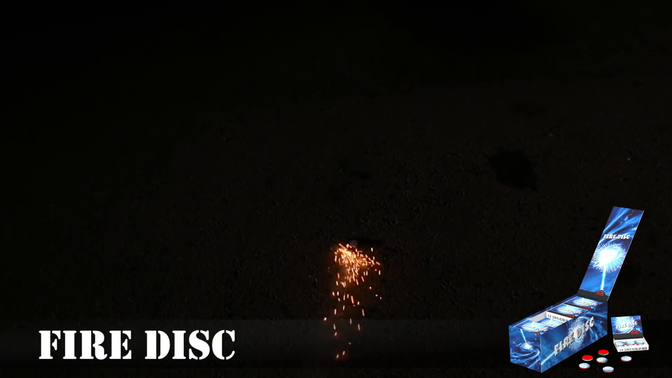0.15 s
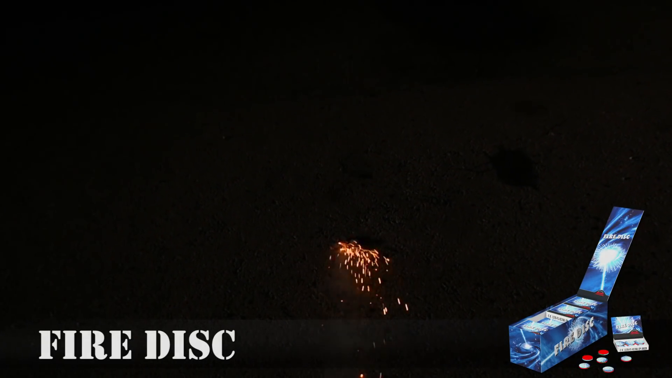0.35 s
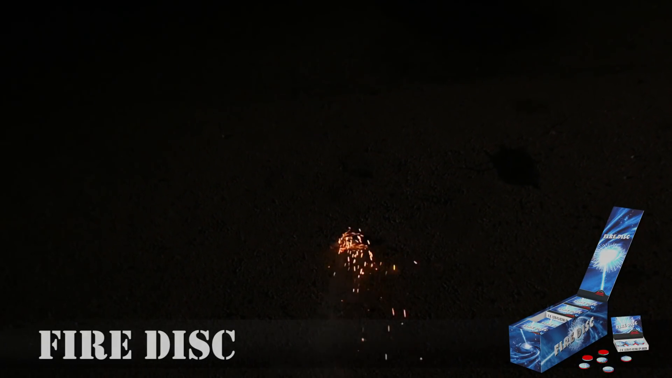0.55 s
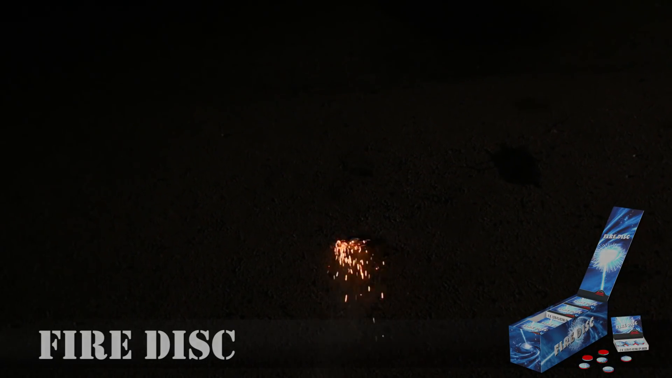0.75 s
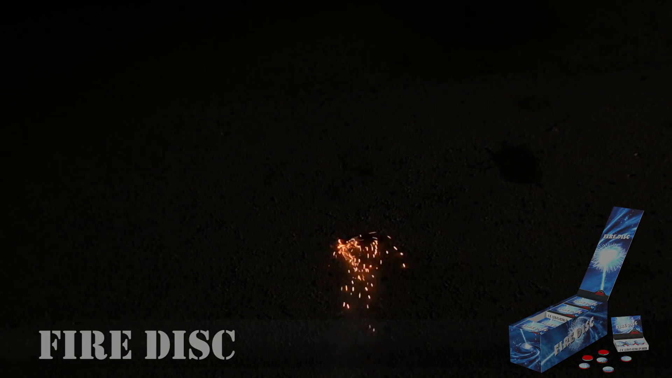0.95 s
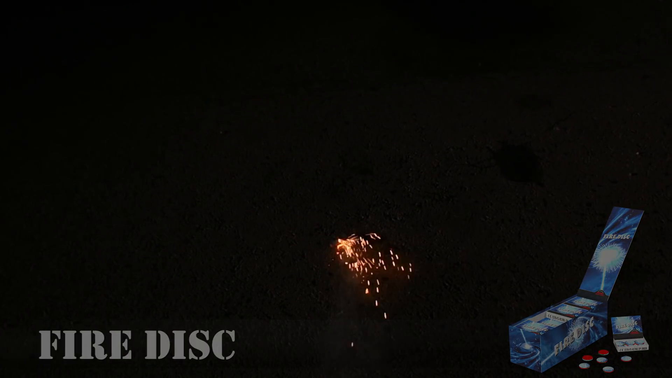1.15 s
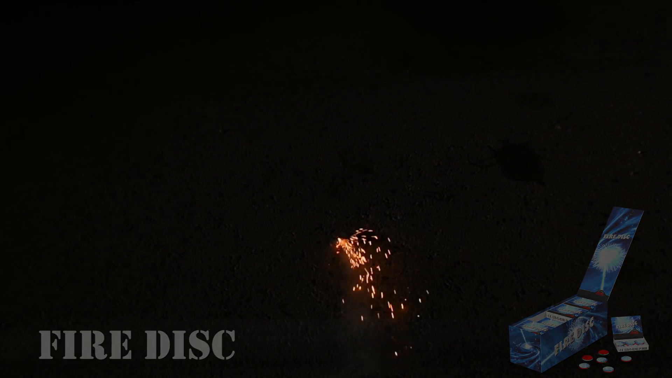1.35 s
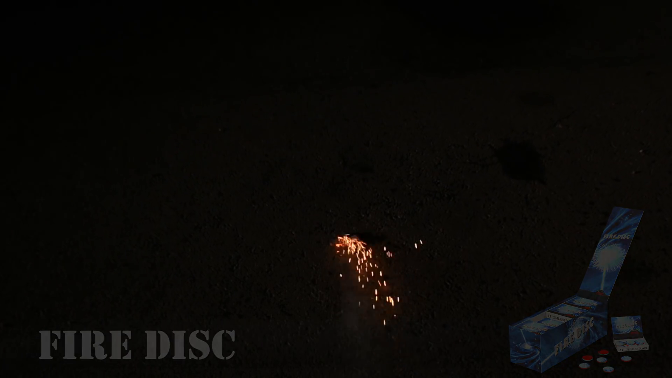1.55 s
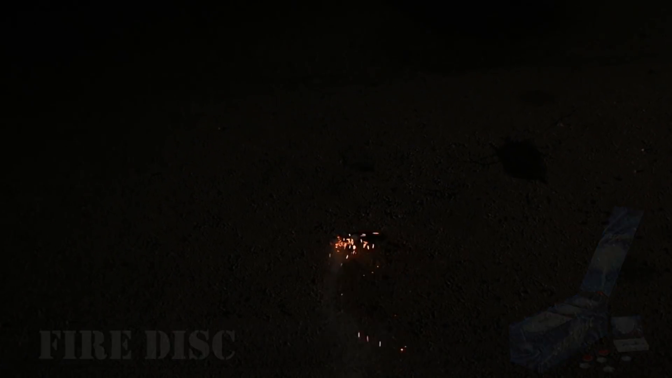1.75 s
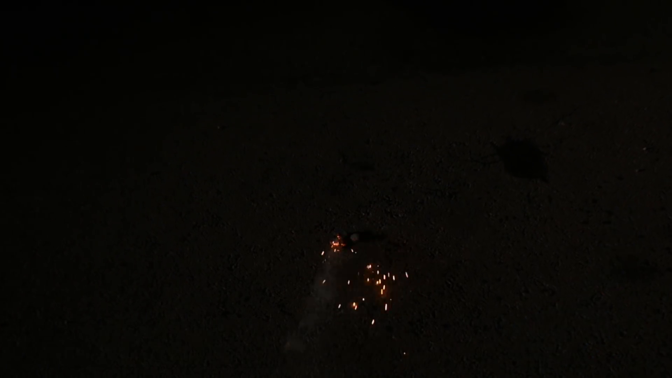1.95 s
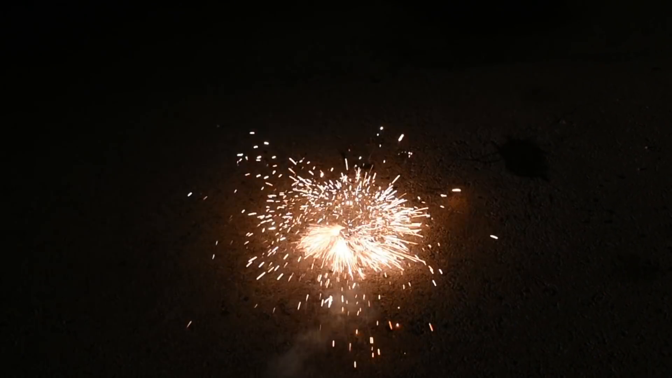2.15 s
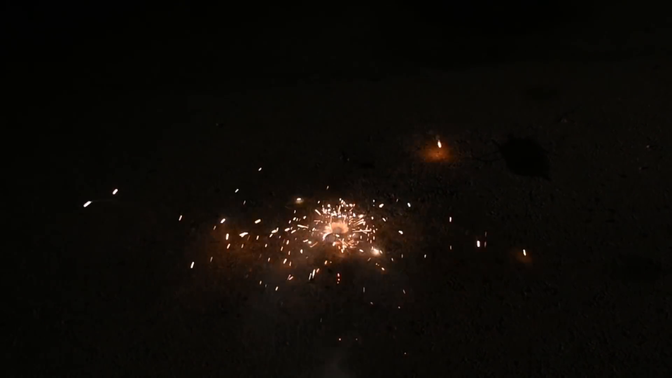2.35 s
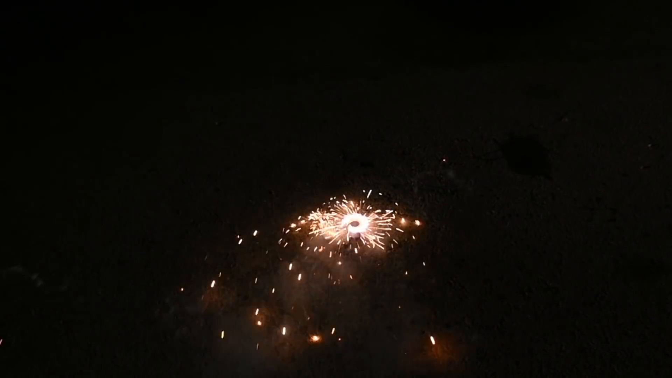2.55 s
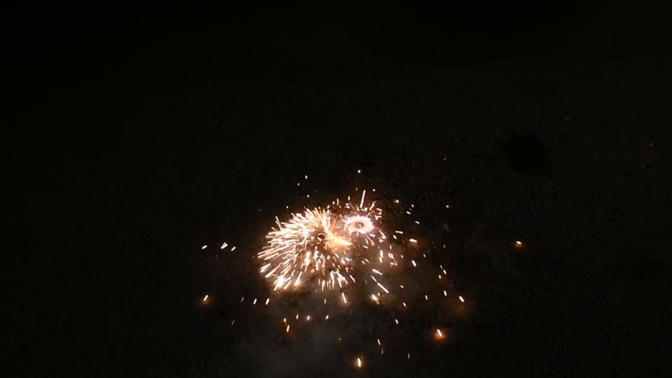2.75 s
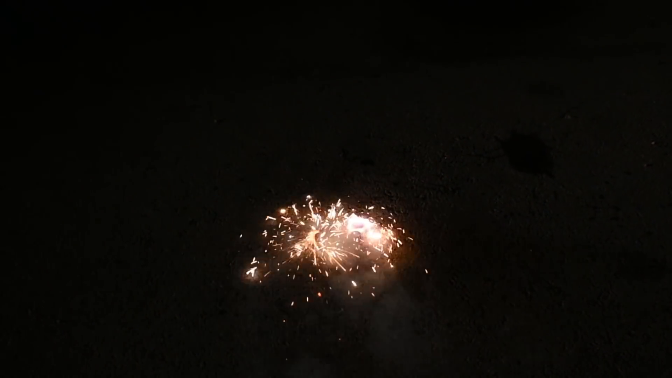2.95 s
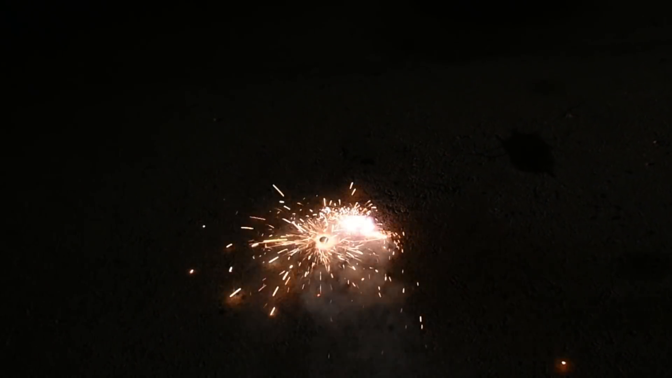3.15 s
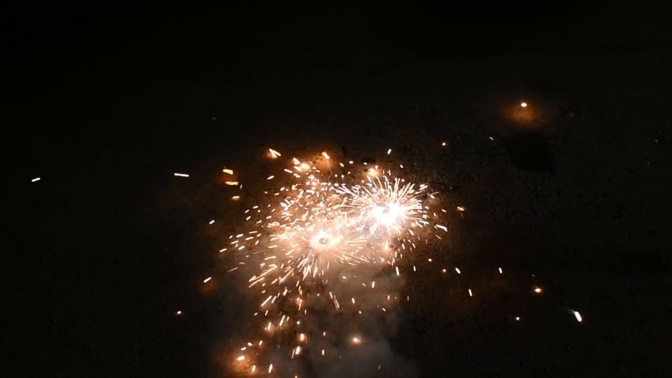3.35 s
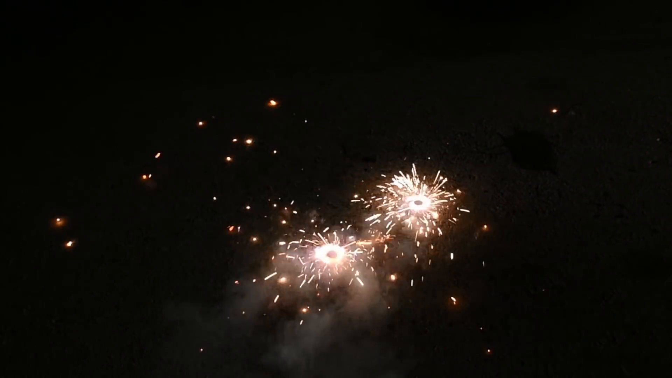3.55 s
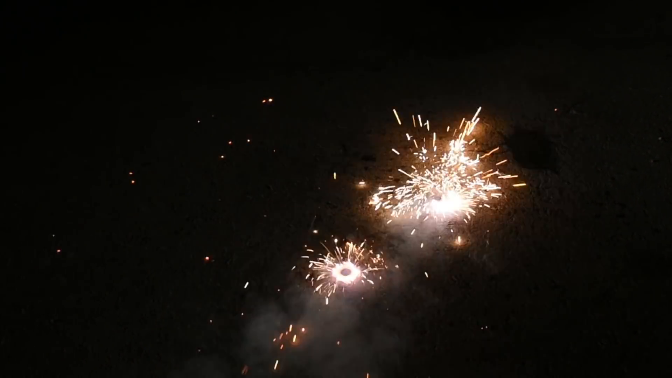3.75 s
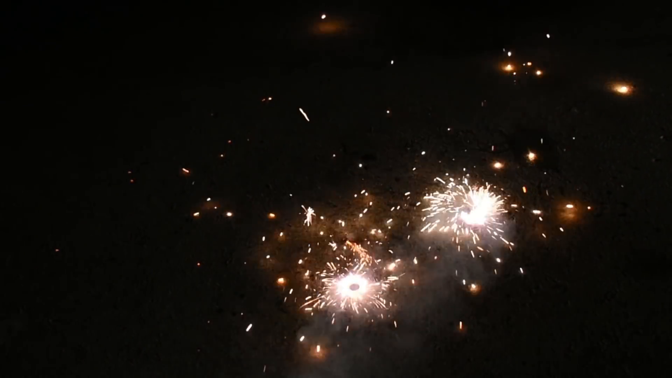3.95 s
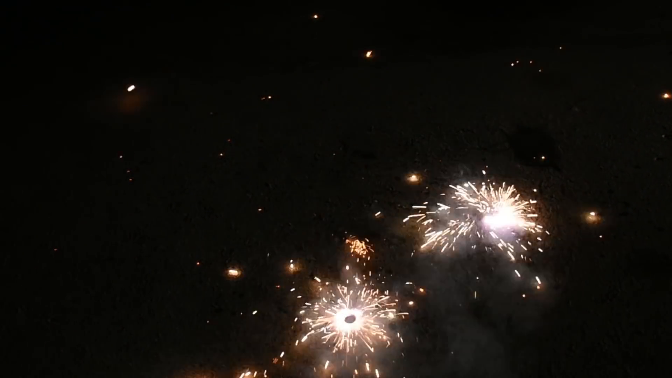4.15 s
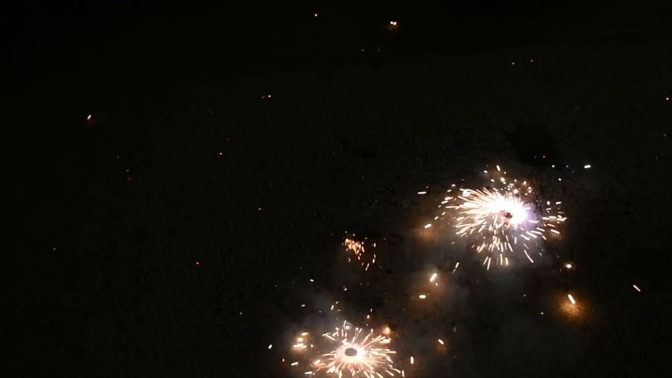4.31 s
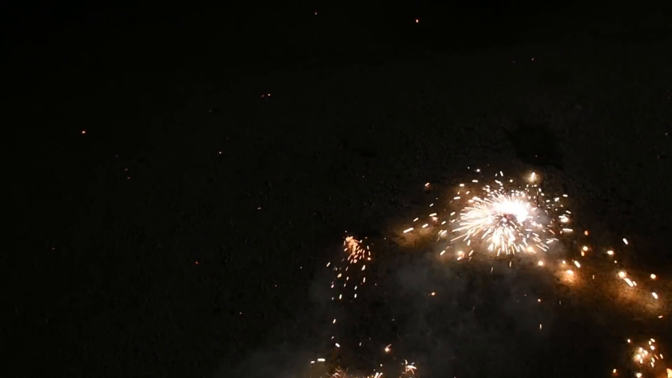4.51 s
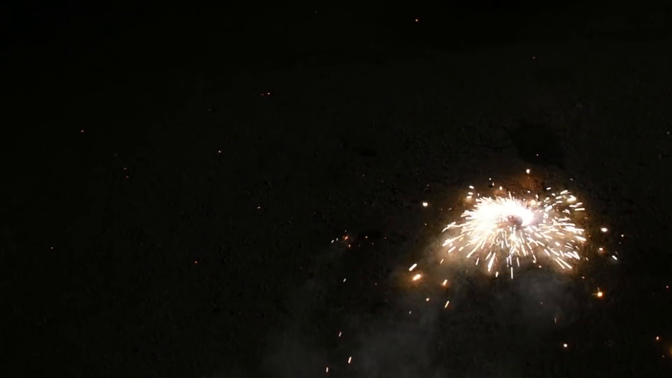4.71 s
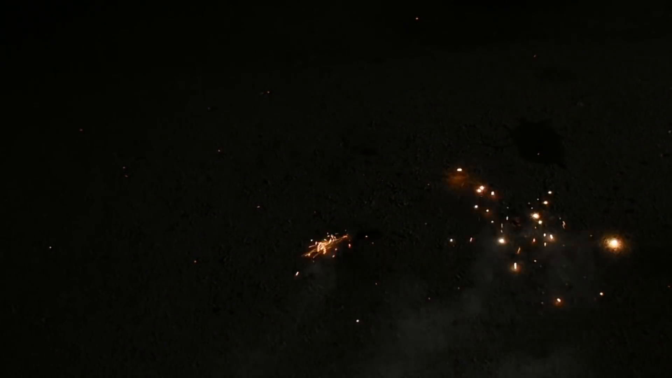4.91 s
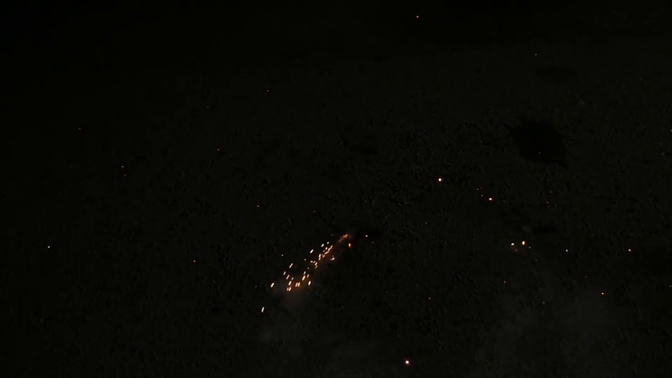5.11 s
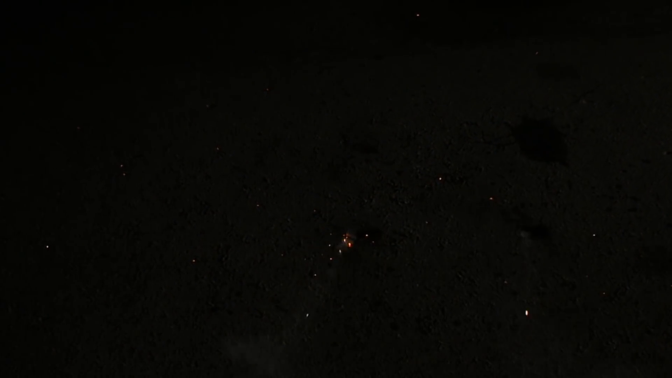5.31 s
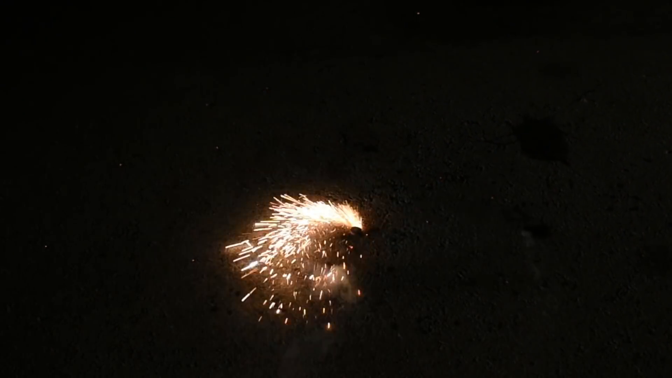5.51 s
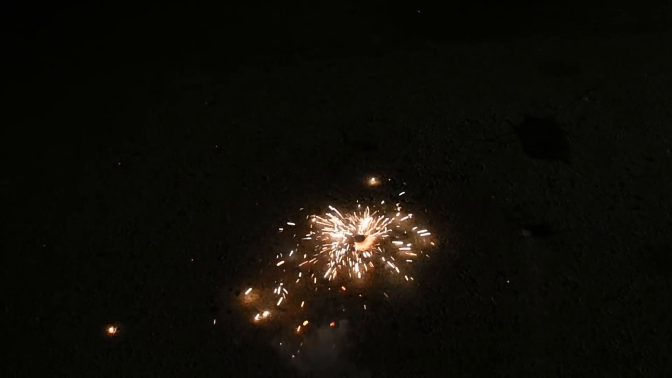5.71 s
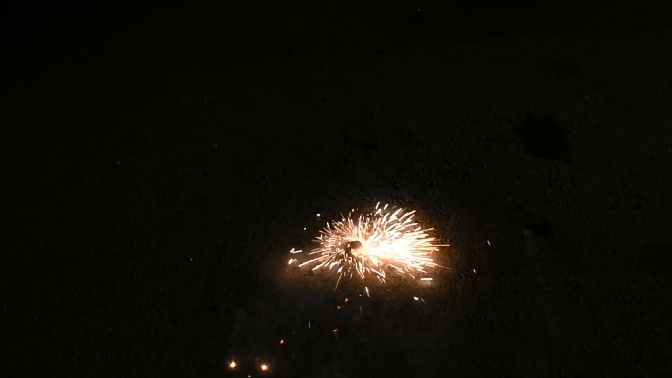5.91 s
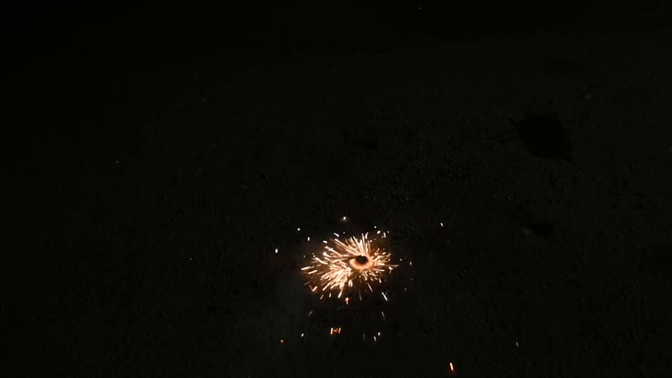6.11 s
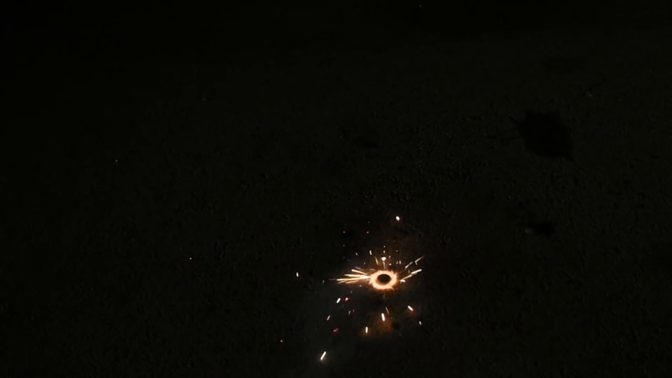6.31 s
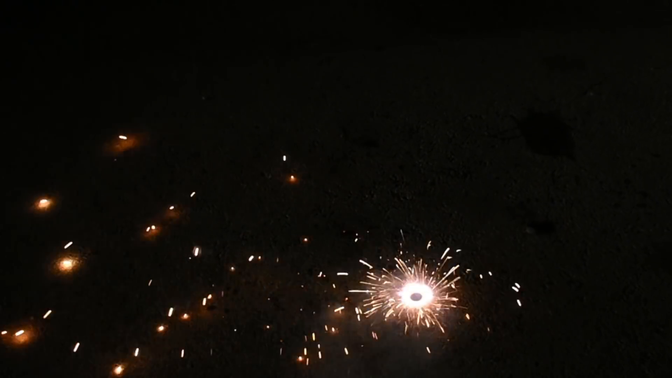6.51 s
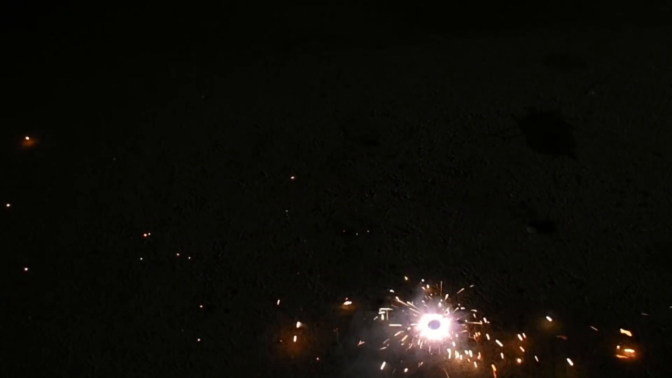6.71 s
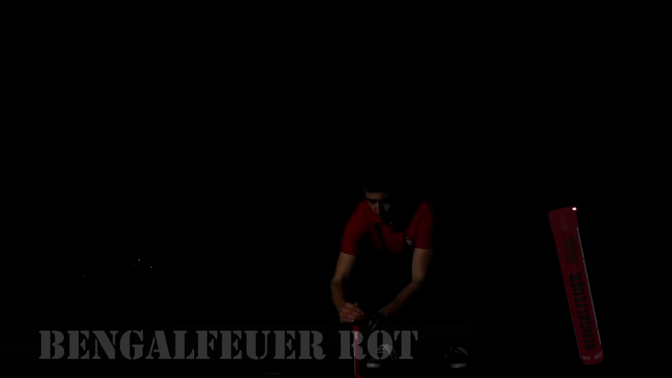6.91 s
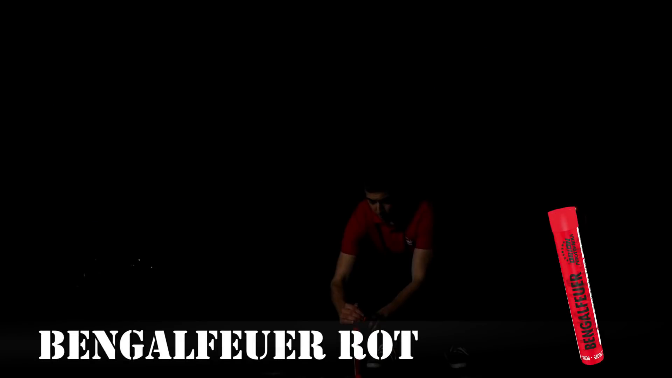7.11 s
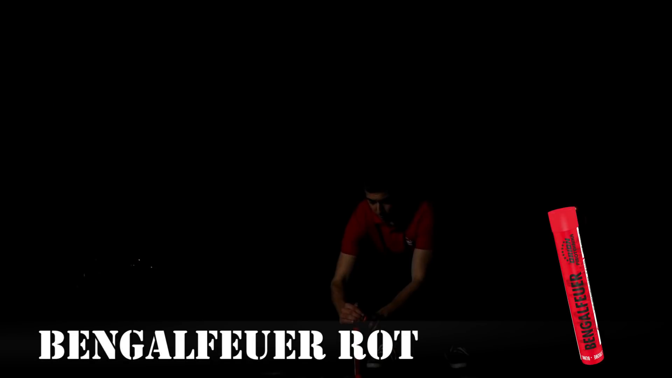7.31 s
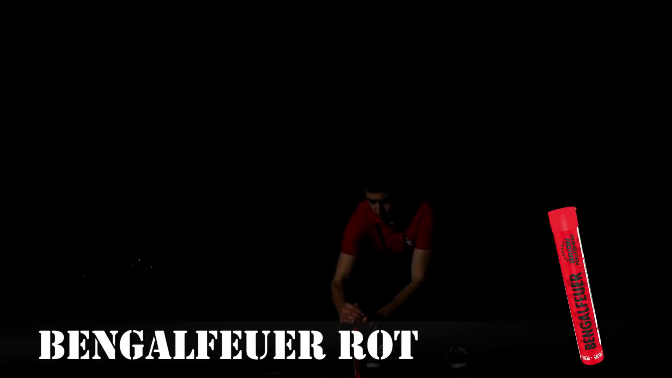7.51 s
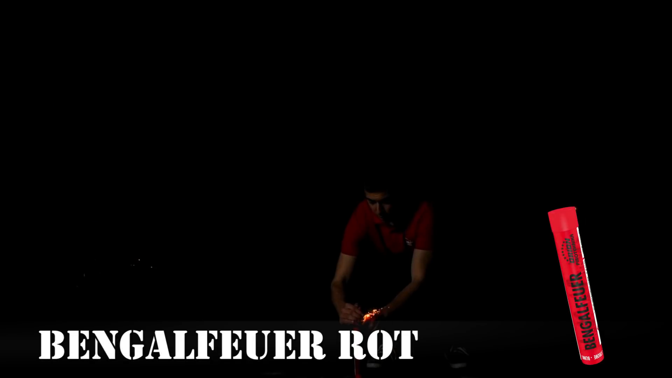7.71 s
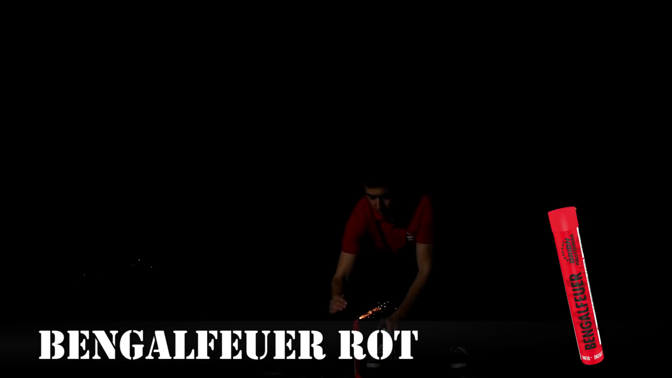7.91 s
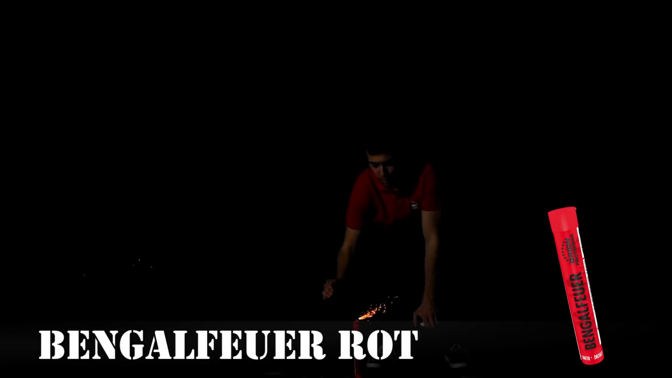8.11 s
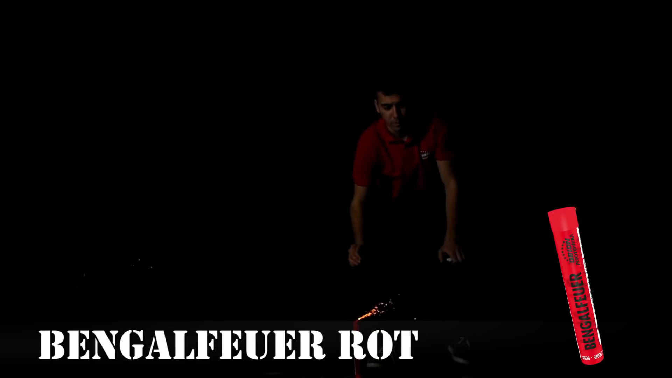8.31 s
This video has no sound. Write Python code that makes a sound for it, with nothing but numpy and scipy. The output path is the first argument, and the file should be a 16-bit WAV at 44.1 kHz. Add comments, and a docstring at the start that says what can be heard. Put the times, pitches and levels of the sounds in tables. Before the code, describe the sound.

Quiet fizz and wind bumps give way to loud whirring jets of sparks, a sharp metallic snap, sudden quiet, and a fresh faint fizz.

```python
"""A fuse fizzes and spits at night on pavement; from 2.1 s small firework discs spin, a few metres away. Jets
roar and hiss as gas noise and sparks, the treble sweeping once a turn; rims knock the ground as pulses. Dull
pulses pop and thud. At 6.9 s the scene changes: a lighter's resonant snap sounds as the jets end and the wind
drops. In the quiet another fuse catches at 7.75 s. Night noise and wind on the microphone ports run throughout."""
import sys
import numpy as np
from scipy import signal
from scipy.fft import rfft, irfft, next_fast_len
from scipy.io import wavfile
from scipy.ndimage import uniform_filter1d

SR = 44100
rng = np.random.default_rng(int(sys.argv[2]) if len(sys.argv) > 2 else 0)


def amplitude_ratio(level_db):
    """Convert a level in decibels to the matching linear amplitude (field) ratio."""
    exponent = np.asarray(level_db, float) / 20
    return 10 ** exponent


def wav_out(sig):
    """Save sig, one row per channel (or a flat mono array), as 16-bit PCM at SR to the path in sys.argv[1]."""
    wavfile.write(sys.argv[1], SR, np.round(np.clip(np.atleast_2d(sig).T, -1, 1) * 32767).astype(np.int16))


N = 368543
T = np.arange(N) / SR
HZ = np.fft.rfftfreq(next_fast_len(N), 1 / SR)


def shape(x, gain):
    """Filter by a gain for each frequency of HZ."""
    size = next_fast_len(N)
    return irfft(rfft(x, size) * gain, size)[..., :N]


def colour(table):
    """Gain of a (Hz, dB) table, interpolated over log frequency."""
    hz, db = np.transpose(table)
    return amplitude_ratio(np.interp(np.log(HZ + 1), np.log(hz), db))


def band(lo_hz, hi_hz):
    """Gain of a soft band; bands that share an edge add up to full power."""
    return np.sqrt(1 / (1 + (HZ / hi_hz) ** 10) - 1 / (1 + (HZ / lo_hz) ** 10))


def mode(hz, width_hz):
    """Causal resonance, gain 1 at its centre."""
    return 1j * HZ * width_hz / (hz ** 2 - HZ ** 2 + 1j * HZ * width_hz)


def unit(x, gain=0.9971):
    """Scale x so that its part within gain has rms 1."""
    return x / np.std(shape(x, gain))


def read(table):
    """Columns of a curve at every sample, and a gate that is open while it lasts."""
    s, *columns = np.transpose(table)
    gate = uniform_filter1d(1. * ((T >= s[0]) & (T <= s[-1])), size=200)
    return [np.interp(T, s, c) for c in columns] + [gate]


def walk(rate_hz):
    """Random levels held 1 / rate_hz seconds and slewed twice; spread near 1."""
    hold = int(SR / rate_hz)
    levels = rng.standard_normal(N // 50)[np.arange(N) // hold]
    return 1.19 * uniform_filter1d(uniform_filter1d(levels, hold), hold)


def swells(table):
    """Bell-shaped gains in dB from (s, dB, length s) rows."""
    return sum(db * np.exp(-((T - s) / length_s) ** 2) for s, db, length_s in table)


def sparks(rate_hz, spread_db):
    """Random clicks of burning metal grains, a few louder than the rest."""
    size_db = spread_db * np.minimum(rng.exponential(size=N), 3)
    struck = rng.random(N) < rate_hz / SR
    return unit(struck * rng.uniform(-0.83, 1, N) * amplitude_ratio(size_db))


def night():
    """Distant traffic and the microphone's own hiss, as one coloured noise."""
    # Spectrum. Each row: frequency in Hz, relative density in dB per Hz.
    night_colour = [(59, -31.5), (100, -6.5), (135, 0), (150, -4.5), (335, -12), (1060, -12), (1760, -19.5),
                    (7940, -29), (14700, -36.5), (16000, -48)]
    level_db = -55
    mid, side = shape(rng.standard_normal((2, N)), colour(night_colour))
    gain = amplitude_ratio(level_db + 1.0 * walk(3.079)) / np.std(mid)
    return gain * (mid + amplitude_ratio(-11) * side * np.array([[1], [-1]]))


def wind():
    """Gusty low-frequency pressure on the ports, partly different left and right."""
    # Breeze level. Each row: time in seconds, level in dB.
    breeze = [(0, -47.5), (1.5, -46.5), (2.0, -49.5), (5.3, -50.5), (6.93, -44), (6.95, -61.5),
              (7.3, -60.5), (7.66, -49.5), (7.9, -58), (8.36, -60.5)]
    # Gusts. Each row: centre in seconds, gain in dB, length in seconds.
    gust_rows = [(.33, 3.5, 0.031), (.52, 6, .04), (.8, 5, 0.116), (1.28, 5, 0.034), (1.4, 7, 0.0215),
                 (2.32, 7.5, 0.062), (3.28, 4.5, 0.09), (4.58, 8, .04), (4.85, 4, 0.107),
                 (5.57, 10.5, 0.052), (5.75, 12, .03), (6.43, 14, 0.042), (7.64, 8, 0.048), (4.9, 8, .012)]
    mid, side = shape(rng.standard_normal((2, N)), band(24, 80))
    flutter = unit(amplitude_ratio(1.9 * walk(22)))
    flutter = flutter / np.sqrt(np.mean(flutter ** 2))
    level = amplitude_ratio(read(breeze)[0] + swells(gust_rows)) * flutter
    return level * (unit(mid) + amplitude_ratio(-12.5) * unit(side) * np.array([[1], [-1]]))


def snap():
    """A lighter's metal snap: a tick and scattered echoes from walls nearby, through metal resonances."""
    # Metal modes. Each row: centre in Hz, width in Hz before squaring, level in dB.
    snap_modes = [(6070, 1200, 0.5), (9300, 3500, -7), (15500, 3000, -11), (3440, 900, -11.5)]
    start_s, peak_db, echo_db, t60_s = 6.8838, -10, -32.5, .34
    t = T - start_s
    tick = 1. * (np.arange(N) == int(start_s * SR))
    decay = amplitude_ratio(-60 * np.clip(t, 0, None) / t60_s)
    echoes = amplitude_ratio(echo_db) * rng.standard_normal(N) * (t > .003) * decay
    ring = sum(amplitude_ratio(db) * mode(hz, width_hz) ** 2 for hz, width_hz, db in snap_modes)
    # the tick alone sets the peak
    return amplitude_ratio(peak_db) * shape(tick + echoes, ring) / np.abs(shape(tick, ring)).max()


def hits():
    """Pops, bumps and thuds: short dull pulses, a few cycles that die away."""
    # Each row: start in seconds, nominal peak in dB, pitch in Hz, decay in cycles.
    pulses = [(0.328, -22.5, 90, 0.68), (.368, -28.5, 1300, 0.9), (0.406, -27, 399, 1.11),
              (.409, -27, 700, 1.51), (.468, -29.5, 5500, 3.2), (.51, -33, 110, 0.87),
              (0.527, -29.5, 110, 0.73), (0.741, -29.5, 60, 0.84), (.787, -23.5, 119, 1.55),
              (1.269, -28, 70, 0.87), (1.487, -27.5, 59.7, 0.5), (3.307, -23, 94.4, 3.3),
              (5.452, -42.5, 180, 1.36), (6.015, -16.5, 350, 1.46), (6.421, -20.5, 65, 0.715),
              (6.449, -17, 200, 0.73)]
    out = np.zeros(N)
    for s, db, hz, cycles in pulses:
        t = np.clip(T - s, 0, None)
        out += amplitude_ratio(db) * 1.126 * np.sin(2 * np.pi * hz * t) * np.exp(-1.5 * t * hz / cycles)
    return out


def fuses():
    """Powder cord fizzes and spits, as noise and sparks; its brighter ranges come and go on their own."""
    # One table a fuse. Each row: time in seconds, level in dB, sizzle over level in dB, hiss over level in dB.
    fuse_levels = [
        [(0.0, -53.5, -1.5, -6), (0.5, -53.5, -1, -6.5), (1.4, -55, -1.5, -4), (2.08, -55.5, -7.5, -5)],
        [(7.752, -70.5, 3, -2.5), (7.758, -56.5, -3, -2.5), (7.878, -51, -4, -4), (7.936, -53.5, -5.5, -4.5),
         (8.008, -58, 5.5, 5), (8.164, -54.5, 8.5, 4), (8.357, -57, 2.5, 1.5)],
    ]
    # One spectrum a fuse. Each row: frequency in Hz, relative density in dB per Hz.
    fuse_colours = [
        [(76, -26.5), (130, 2), (253, -15.5), (285, -6.5), (651, -16), (1240, -12.5), (2720, -20), (5730, -31),
         (16000, -38)],
        [(120, -44), (200, -7.5), (387, -1), (683, -1.5), (735, 1), (1620, -3), (2170, -8), (4040, -8.5),
         (16000, -16)],
    ]
    # Spits. Each row: centre in seconds, treble gain in dB, length in seconds.
    spits = [(.214, 5.5, .002), (.369, 4.5, .002), (.46, 6.5, 0.014), (1.665, 6, .0015),
             (1.689, 8.5, .0015), (1.74, 7, .006), (1.747, 12, .0015), (1.858, 9, .0015)]
    out = 0
    for table, tint in zip(fuse_levels, fuse_colours):
        db, sizzle_db, hiss_db, gate = read(table)
        gate = np.maximum(gate, np.roll(gate, 600))  # smoulders on 14 ms; the first fuse meets the jet
        grains = 0.548 * sparks(900, 3.0) + 0.3 * sparks(45, 2.5)
        fizz = shape(rng.standard_normal(N) + grains, colour(tint))
        body = unit(shape(fizz, band(112, 2148)), band(1304, 2700)) * amplitude_ratio(0.75 * walk(15))
        sizzle = unit(shape(fizz, band(2633, 6250))) * amplitude_ratio(sizzle_db + swells(spits) + 1.7 * walk(30))
        hiss = unit(shape(fizz, band(7900, 20660))) * amplitude_ratio(hiss_db + swells(spits) + 1.1 * walk(30))
        out = out + gate * amplitude_ratio(db + 0.77 * walk(25)) * (body + sizzle + hiss)
    return out


def spins():
    """Each turn swings the jet towards the listener and knocks the rim on the ground."""
    # One table a spin. Each row: time in seconds, mean turns per second, rim knock level in dB.
    spin_curves = [
        [(2.12, 13.6, -60), (2.24, 27.4, -45), (2.31, 60, -43), (2.335, 76, -40), (2.365, 82, -26.5),
         (2.43, 83.5, -28.5), (2.47, 80, -48)],
        [(2.47, 106.7, -53), (2.72, 104.5, -57.5), (2.82, 105, -39), (3.2, 101.1, -42), (3.3, 117.3, -31),
         (3.38, 98, -43.5), (3.8, 92.7, -57.5)],
        [(2.74, 17.6, -66), (3.08, 49, -50), (3.25, 94, -51), (3.42, 158.3, -51), (3.5, 158.3, -37.5),
         (3.95, 153.4, -38.5), (4.0, 156.5, -33.5), (4.08, 165.6, -31.5), (4.14, 153, -64)],
        [(4.0, 26.5, -62), (4.15, 38, -60.5), (4.5, 39, -51.5), (4.85, 30, -59.5)],
        [(4.88, 107, -54), (5.3, 90, -59), (5.4, 50, -66)],
        [(5.6, 13, -60), (5.96, 52.9, -50), (6.25, 93.8, -54), (6.56, 147, -47), (6.8, 134, -34),
         (6.92, 111, -52)],
    ]
    # One row a spin: dull ring of the rim in Hz, treble sweep in dB before beaming.
    rims = [(267, 2), (200, 2.35), (180, 2), (200, 2), (252.3, 2), (191, 1.3)]
    scatter_db = 2.6
    sweep_db, knocks = 0, 0
    for table, (ring_hz, depth_db) in zip(spin_curves, rims):
        rate_hz, knock_db, gate = read(table)
        turns = np.cumsum(rate_hz * (1 + .018 * walk(30))) / SR + rng.random()
        sweep_db = sweep_db + gate * depth_db * np.cos(2 * np.pi * turns)
        once_a_turn = np.diff(np.floor(turns), prepend=0)
        strength = amplitude_ratio(scatter_db * (walk(60) + .5 * walk(13)))
        pulses = once_a_turn * np.sqrt(SR / rate_hz) * strength  # even power at any rate
        ring = shape(pulses, mode(ring_hz, 1.59 * ring_hz) ** 3)
        knocks = knocks + gate * amplitude_ratio(knock_db) * ring / np.std(ring[gate > 0])
    return sweep_db, knocks


def jets():
    """Gas noise and sparks in five ranges; the higher, the more beamed, so the more it sweeps and sputters."""
    # Jet spectrum. Each row: frequency in Hz, relative density in dB per Hz.
    jet_colour = [(35, -32.5), (60, -1), (155, -2.5), (265, -6), (402, -0.5), (717, -3.5), (824, -0.5),
                  (1140, -2.5), (2130, 2), (4270, -4), (5030, -7), (8770, -7.5), (15300, -2)]
    # Low rumble, fullest while a disc is near or lies on the ground. Each row: time in seconds, level in dB.
    rumble = [(2.09, -46), (2.13, -35.5), (2.25, -30.5), (2.41, -32.5), (2.47, -42), (2.61, -33),
              (3.21, -36.5), (3.32, -24.5), (3.34, -38), (3.41, -28.5), (3.94, -30.5), (4.11, -27),
              (4.65, -30), (5.22, -27.5), (5.35, -32), (5.58, -26), (5.65, -34), (5.86, -39), (6.08, -32.5),
              (6.17, -39), (6.39, -37.5), (6.62, -29.5), (6.93, -35)]
    # Roar of gas that burns unevenly. Each row: time in seconds, level in dB.
    roar = [(2.09, -43.5), (2.14, -31.5), (2.21, -22.5), (2.32, -23.5), (2.48, -32), (2.6, -23.5),
            (2.72, -27), (3.19, -32.5), (3.32, -25), (3.36, -32), (3.49, -22), (3.57, -28.5), (4.39, -26),
            (4.81, -28), (4.85, -22.5), (4.89, -28.5), (5.03, -20), (5.39, -27.5), (5.45, -22.5),
            (5.47, -26.5), (5.7, -24.5), (5.89, -30), (6.09, -25.5), (6.19, -31), (6.66, -26.5),
            (6.73, -38), (6.77, -32.5), (6.93, -37)]
    # Treble; a jet pointing away or far off sounds dull.
    # Each row: time in seconds, hiss level in dB, dullness (sizzle over hiss) in dB.
    treble = [(2.09, -53, 2), (2.14, -33, -1.5), (2.22, -27, 1.5), (2.34, -24.5, 1.5), (2.48, -44.5, 4.5),
              (2.53, -33, 1.5), (2.77, -35.5, 2.5), (2.81, -29, -0.5), (3.05, -36.5, 4), (3.27, -26.5, 0),
              (3.31, -20, -0.5), (3.33, -27, 0.5), (3.38, -30, -1), (3.43, -36, 6.5), (3.66, -35.5, 0.5),
              (3.78, -41.5, 2), (3.99, -31, -1), (4.34, -32.5, 2), (4.66, -31, -2), (4.95, -35, 0),
              (4.98, -33.5, 4), (5.54, -41.5, 9.5), (5.6, -25, -3), (5.62, -26.5, 1.5), (5.82, -30.5, 1),
              (6.04, -24, -1), (6.2, -29, 0.5), (6.42, -28, -0.5), (6.47, -32, 2.5), (6.63, -26, -1),
              (6.72, -40.5, -0.5), (6.82, -40, 0.5), (6.87, -48, 5.5)]
    # The jet flares or falters. Each row: centre in seconds, gain in dB, length in seconds.
    flares = [(2.3, 1, 0.015), (2.59, 2.5, 0.022), (2.81, 3, 0.024), (3.299, 2, 0.0027), (3.308, 6, 0.0025),
              (3.316, 4, .002), (5.24, 2, .04), (5.385, -4.5, .015), (5.44, 2.5, .02), (6.1, 2.5, .015)]
    start_s, end_s = 2.09, 6.938
    hiss_db, dull_db, _ = read(treble)
    top_db = hiss_db - 1 - 1.2 * dull_db  # dullness costs the topmost hiss extra
    sweep_db, knocks = spins()
    sputter_db = 0.87 * walk(18) + 1.03 * walk(60) + 0.81 * walk(200)
    crackle = sparks(4000, 2.0)
    # Each row: low edge in Hz, high edge in Hz, level in dB, beaming factor, spark weight.
    ranges = [(99.43, 1205, read(rumble)[0], 0.18, 0.36),
              (1167, 3136, read(roar)[0], 0.34, 0.448),
              (3323, 6170, hiss_db + dull_db, 0.9, 0.436),
              (7110, 9010, hiss_db, 1.087, 0.51),
              (12493, 12500, top_db, 1.2, 0.8)]
    out = 0
    for lo_hz, hi_hz, db, beam, share in ranges:
        gas = rng.standard_normal(N) + share * crackle
        gas = unit(shape(gas, colour(jet_colour) * band(lo_hz, hi_hz)))
        out = out + gas * amplitude_ratio(db + swells(flares) + beam * (sweep_db + sputter_db) + 0.76 * walk(12))
    burning = uniform_filter1d(1. * ((T > start_s) & (T < end_s)), size=90)
    return burning * (out + knocks)


def scene():
    """Two close ports hear nearly the same; the side is a phase-shifted and scattered copy of the mid."""
    # Stereo width by frequency, nearly mono around 700 Hz.
    # Each row: frequency in Hz, side level relative to mid in dB before the width over time.
    side_colour = [(60, -23), (200, -43.5), (700, -91), (1500, -55.5), (3500, -35.5), (5800, -20.5),
                   (7200, -24), (10000, -26), (10900, -19.5)]
    # Stereo width over time: wide in the fuses and quiet, narrower in most jets.
    # Each row: time in seconds, side gain in dB.
    width = [(0, 18), (2.06, 24.5), (2.12, -15.5), (3.4, -10.5), (4.1, -1), (4.35, 6.5), (4.6, -6.5),
             (4.9, 10.5), (5.1, 13), (5.5, 20), (5.62, -13), (6.3, -9), (6.6, -7), (6.85, 3.5), (6.9, 23),
             (8.36, 19.5)]
    split_hz, upper_side_db = 11000, -9  # above the split the side has its own level
    mid = jets() + fuses() + hits() + snap()
    apart = 0.32 * shape(mid, 1j) + 0.734 * mid * unit(walk(400))  # quarter-cycle shift and scatter
    below = HZ < split_hz
    width_db = read(width)[0]
    side = amplitude_ratio(width_db) * shape(apart, colour(side_colour) * below)
    side = side + amplitude_ratio(upper_side_db + 0.27 * width_db) * shape(apart, ~below)
    return mid + side * np.array([[1], [-1]]) + wind() + night()


def band_limit(x):
    """A steep low-pass at the top of the band."""
    return signal.sosfilt(signal.butter(12, 17020, fs=SR, output="sos"), x)


def record(dry):
    """Clips peaks beyond the input's limit, then cuts the top."""
    limit, top_hz = .88, 15900
    clipped = np.clip(dry, -limit, limit)
    mix = shape(clipped, HZ < top_hz)
    return band_limit(mix)


dry = scene()
out = record(dry)
wav_out(out)
```